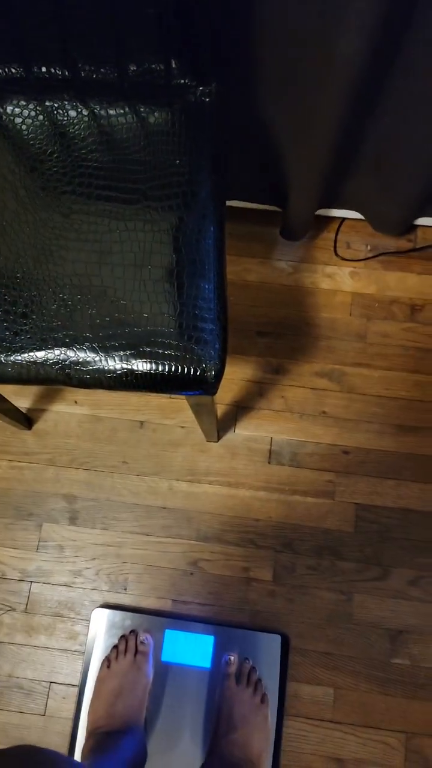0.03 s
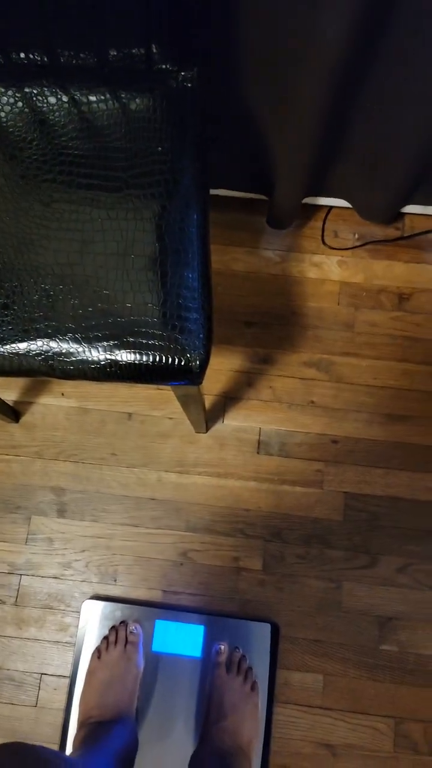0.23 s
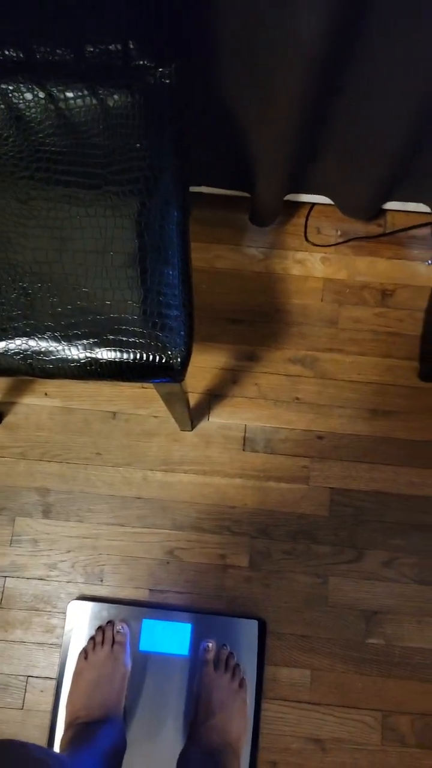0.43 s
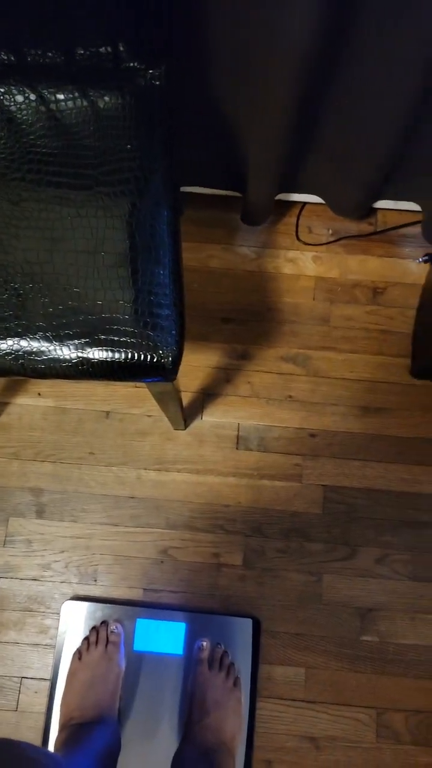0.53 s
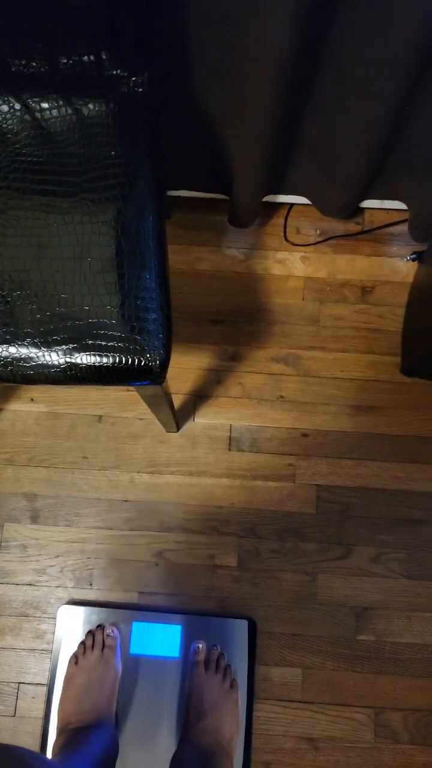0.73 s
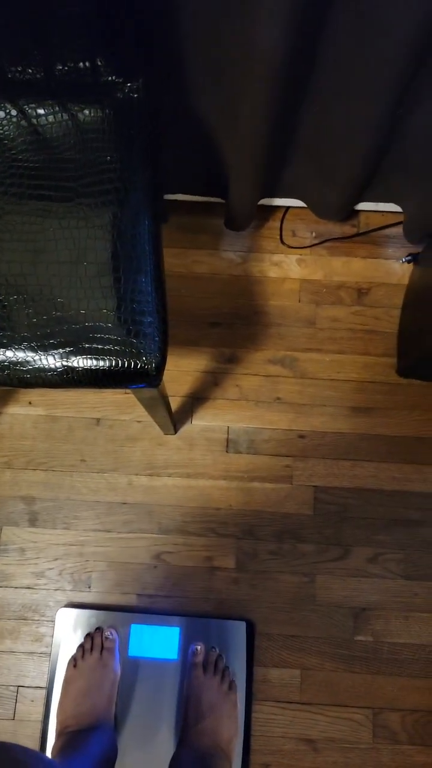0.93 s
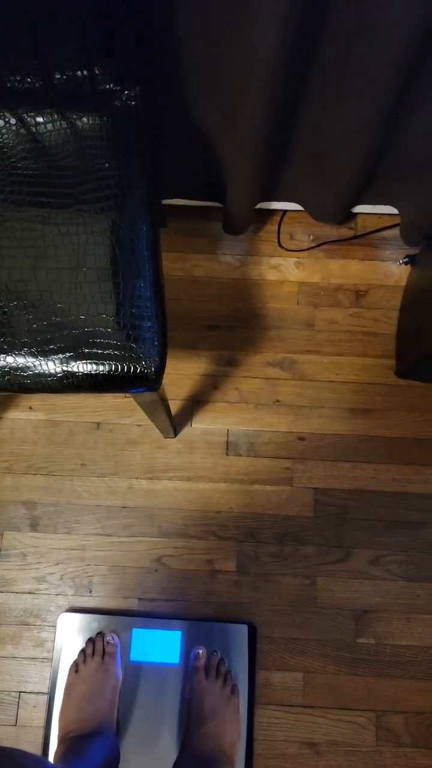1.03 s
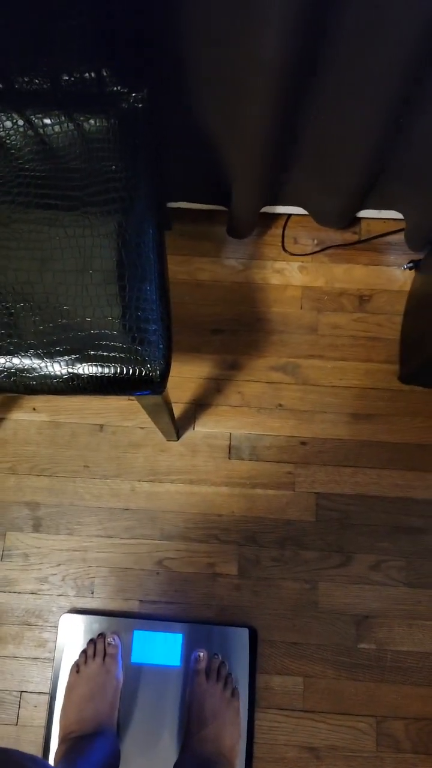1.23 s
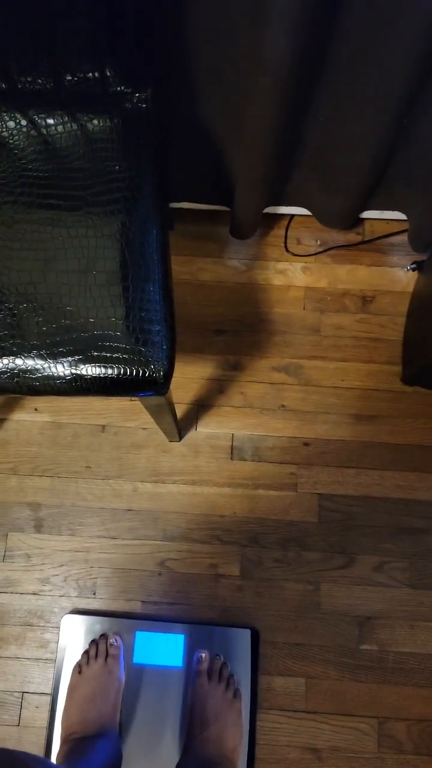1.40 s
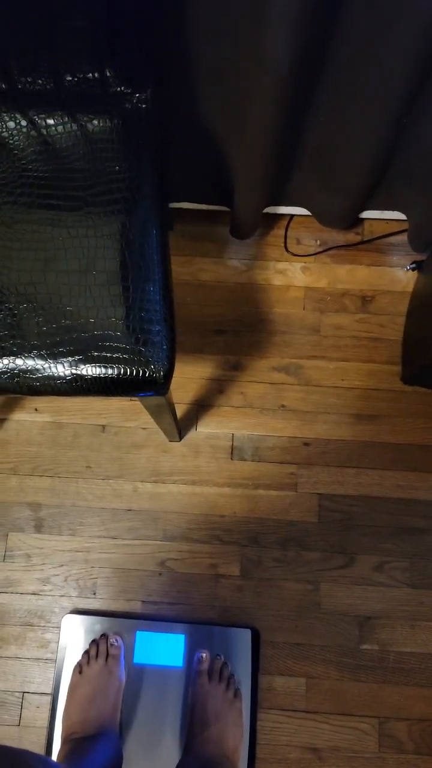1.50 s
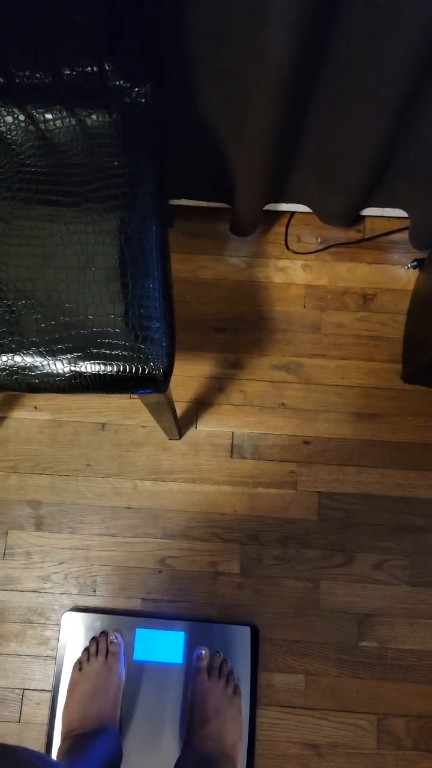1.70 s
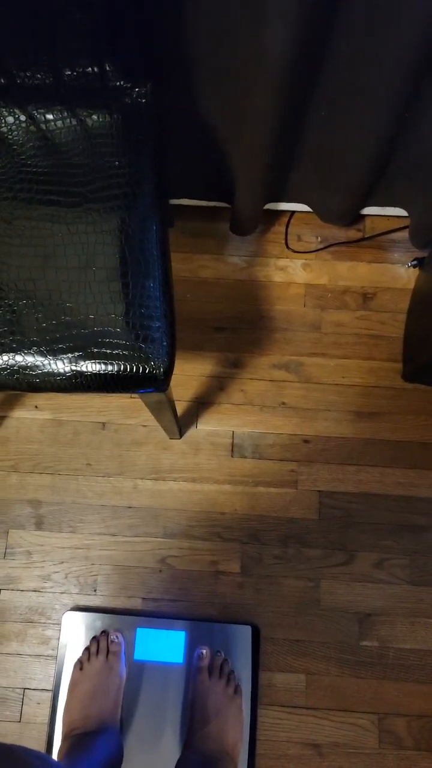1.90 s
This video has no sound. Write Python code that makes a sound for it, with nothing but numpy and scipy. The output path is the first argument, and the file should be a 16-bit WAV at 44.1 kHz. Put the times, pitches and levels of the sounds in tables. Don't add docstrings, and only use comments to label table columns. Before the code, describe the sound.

A single hard knock of a bathroom scale on a wooden floor, then faint rustling at home

```python
import sys
import numpy as np
from scipy import signal
from scipy.io import wavfile
from scipy.ndimage import uniform_filter1d

SR = 44100
rng = np.random.default_rng(int(sys.argv[2]) if len(sys.argv) > 2 else 0)


def generate_wav(sig):
    pcm = np.round(np.clip(np.atleast_2d(sig).T, -1, 1) * 32767).astype(np.int16)
    wavfile.write(sys.argv[1], SR, pcm)


def attenuation_scalar(level_db):
    decades = np.asarray(level_db, float) / 20
    return 10 ** decades


N = 85995
BANDS_HZ = 28 * 2 ** np.arange(0, 9.2, 1 / 3)
OPPOSED = np.array([[1], [-1]])


def curve(table, at, col=1, log=False):
    a = np.array(table, float)
    if log:
        return np.interp(np.log(at), np.log(a[:, 0]), a[:, col])
    return np.interp(at, a[:, 0], a[:, col])


def unit(x):
    return x / np.sqrt(np.mean(x ** 2))


def band(x, hz, width):
    ratio = np.sqrt(1 + width)
    edges_hz = [hz / ratio, min(hz * ratio, .45 * SR)]
    return signal.sosfilt(signal.butter(2, edges_hz, "band", fs=SR, output="sos"), x)


def walk(rate_hz):
    k = int(SR / rate_hz)
    return unit(uniform_filter1d(uniform_filter1d(rng.standard_normal(N), k), k))


def fall(since, rise, t60):
    return np.exp(np.where(since < 0, since / rise, -since * np.log(1000) / t60))


# [f/Hz, correlation]
LIKENESS = [(30, 1), (130, 0.58), (290, .75), (640, 0.1), (1300, -0.83), (3100, 0.14), (6800, -0.15),
            (15000, .1)]


def diffuse(hz, width):
    alike = np.clip(curve(LIKENESS, hz, log=True), -.97, .97)
    mid = unit(band(rng.standard_normal(N), hz, width))
    side = unit(band(rng.standard_normal(N), hz, width))
    return np.sqrt((1 + alike) / 2) * mid + np.sqrt((1 - alike) / 2) * side * OPPOSED


# [f/Hz, level/dB per Hz]
ROOM_BANDS = [(28, -10), (42, -23.5), (60, -10), (240, -10.5), (400, -19.5), (1300, -28), (2200, -39.5),
              (5000, -52.5)]
# [t/s, level/dB]
ROOM_FADE = [(0, 5.5), (.5, 5.5), (1., 3.5), (1.4, 2.5), (1.95, 0)]
# [f/Hz, level/dB, width/Hz]
HUM = [(58.07, -63.5, 7), (124.07, -70.5, 6.5), (187.8, -81.5, 2)]
ROOM_DB = -64.5


def room_tone(t):
    air = 0
    for hz in BANDS_HZ[:-4]:
        flicker_db = 1. * walk(2)
        level = attenuation_scalar(curve(ROOM_BANDS, hz, log=True) + flicker_db)
        air = air + level * np.sqrt(hz) * diffuse(hz, 0.28)
    air = attenuation_scalar(ROOM_DB + curve(ROOM_FADE, t)) * unit(air)
    hum = sum(attenuation_scalar(db) * diffuse(hz, width / hz) for hz, db, width in HUM)
    return air + hum


# [t/s, level/dB]
DRONE_LEVEL = [(0, -62), (.3, -62), (.35, -55), (.48, -61), (.515, -50), (.675, -51), (.73, -65),
               (.84, -52), (.93, -58), (.99, -49.5), (1.03, -58), (1.06, -52), (1.14, -61), (1.21, -55),
               (1.255, -69), (1.285, -51), (1.45, -61), (1.95, -70)]
# [t/s, f/Hz]
DRONE_PITCH = [(0, 218), (.07, 236), (.3, 247), (.5, 250), (.66, 250), (.72, 242), (.83, 246), (1.1, 244.5),
               (1.25, 251), (1.45, 243), (1.6, 240), (1.7, 256), (1.95, 262)]
DRONE_ROUGH_RAD, DRONE_WOBBLE_DB, DRONE_SIDE_DB = .25, 1., -11


def drone(t):
    phase = 2 * np.pi * np.cumsum(curve(DRONE_PITCH, t)) / SR + DRONE_ROUGH_RAD * walk(25)
    size = np.sqrt(2) * attenuation_scalar(curve(DRONE_LEVEL, t) + DRONE_WOBBLE_DB * walk(30))
    side = attenuation_scalar(DRONE_SIDE_DB) * np.cos(phase) * OPPOSED
    return size * (np.sin(phase) + side)


# [t/s, rise/s, fall t60/s,
# level/dB, centre f/Hz]
RUSTLES = [(0.215, 0.0068, 0.025, -57.5, 3000), (0.216, 0.0077, 0.028, -51, 1500),
           (0.215, 0.0074, 0.012, -65, 5500), (.527, .001, 0.033, -81.5, 13500),
           (.527, 0.0014, 0.16, -77, 4300), (0.544, 0.019, 0.21, -71.5, 3210),
           (0.556, 0.00086, 0.14, -54, 900), (0.568, 0.015, 0.075, -61, 1540),
           (0.592, 0.0019, 0.13, -59, 4440), (.590, 0.027, .17, -74, 6560),
           (0.604, 0.0011, 0.14, -52, 1070), (0.602, 0.0028, .18, -59, 1790),
           (0.602, 0.0026, 0.19, -55, 3090), (0.603, 0.0084, 0.21, -64, 5700),
           (.604, 0.0054, 0.11, -66.5, 8100), (.600, 0.0061, 0.29, -74.5, 13000),
           (0.759, .08, .6, -75, 2300), (0.749, .06, .6, -85, 8500), (1.047, .008, 0.089, -66.5, 1797),
           (1.055, 0.02, 0.14, -69.5, 2520), (1.135, 0.0025, 0.06, -71.5, 3450),
           (1.1, 0.064, 0.42, -81.5, 3500), (.575, 0.016, 0.23, -68, 2330), (0.6, 0.003, 0.073, -62.5, 526)]
RUSTLE_WIDTH, RUSTLE_GRIT_DB = .4, 1.5
SCUFF_SHAPE = 1.45


def rustles(t):
    out = 0
    for at, rise, t60, db, hz in RUSTLES:
        since = t - at
        held = t60 * (np.abs(since) / t60) ** SCUFF_SHAPE
        env = fall(np.where(since < 0, since, held), rise, t60)
        width = RUSTLE_WIDTH * np.clip(t60 / .15, .3, 4)
        out = out + attenuation_scalar(db + RUSTLE_GRIT_DB * walk(340)) * env * diffuse(hz, width)
    return out


KNOCK_AT_S = .2197
# [f/Hz, level/dB, t60/s, build-up/s]
PLATE_MODES = [(150.6, -11, 0.11, 0.014), (776, -30, .15, .004), (175, -27, .13, .015),
               (213, -32.5, 0.24, 0.0029), (355, -36, 0.15, 0.0048), (455, -51.5, .15, 0.006),
               (501, -23.5, 0.16, 0.0052), (900, -26.5, 0.11, .003), (957, -44.5, .15, 0.0077),
               (1026, -30.5, 0.18, 0.0026), (1123, -44.5, 0.14, 0.0031), (1356, -33, 0.24, 0.0048),
               (1376, -43, 0.29, .006), (2485, -46, .13, 0.0046)]


def plate(since):
    out = np.zeros((2, N))
    for hz, db, t60, grow in PLATE_MODES:
        alike = np.clip(curve(LIKENESS, hz, log=True), -1, 1)
        lag = np.arccos(alike) * .35 * OPPOSED
        env = (1 - np.exp(-since / grow)) ** 2 * fall(since, 1, t60)
        out += attenuation_scalar(db) * env * np.sin(2 * np.pi * hz * since + lag)
    return out


# [t/s, level/dB, f/Hz]
CONTACTS = [(.2199, -14, 1560), (.2212, -23, 1330), (.2228, -7, 1134), (.2320, -21.5, 1193),
            (0.24, -18.5, 2390), (0.2498, -18, 1200), (0.256, -19, 1300), (0.275, -20.5, 1200),
            (.5585, -47.5, 700), (.6015, -63, 1170), (0.61, -43, 3040)]


def contacts(t):
    out = np.zeros((2, N))
    port_delay_s = np.array([[0], [.0003]])
    for at, db, hz in CONTACTS:
        since = np.maximum(t - at - port_delay_s, 0)
        out += attenuation_scalar(db) * (since / .0007) * np.exp(-since / 0.00092) * np.sin(2 * np.pi * hz * since)
    return out


# [f/Hz, level/dB]
KNOCK_BANDS = [(80, -16.5), (250, -14.5), (600, -12.5), (1100, -6), (2600, -16.5), (4500, -23), (9500, -43),
               (15500, -46)]
# [f/Hz, t60/s]
RING = [(100, 0.39), (500, 0.19), (1500, .26), (4000, 0.2), (9000, 0.12), (15000, 0.1198)]
KNOCK_DB, RATTLE_HOLD_S, CLUMP_DB = -25, 0.016, 2.5
TAIL_DB, TAIL_T60_S = -49.5, 0.97


def rattle_and_room(since):
    wash = 0
    tail = attenuation_scalar(TAIL_DB) * fall(since, 1, TAIL_T60_S)
    for hz in BANDS_HZ[8:].tolist() + [75., 95.]:
        hold_s = RATTLE_HOLD_S * min(1, 3000 / hz)
        early = fall(np.maximum(since - hold_s, 0), 1, curve(RING, hz, log=True))
        level = attenuation_scalar(curve(KNOCK_BANDS, hz, log=True) + CLUMP_DB * walk(120)) * np.sqrt(hz / 1000)
        wash = wash + level * (early + tail) * diffuse(hz, 0.28)
    onset = 1 - np.exp(-since / 0.00013)
    return attenuation_scalar(KNOCK_DB) * wash * onset


def knock(t):
    since = np.maximum(t - KNOCK_AT_S, 0)
    return plate(since) + contacts(t) + rattle_and_room(since)


def scene():
    t = np.arange(N) / SR
    right_db = 3.2
    mix = room_tone(t) + drone(t) + rustles(t) + knock(t)
    return mix * attenuation_scalar(-right_db / 2 * OPPOSED)


# [f/Hz, band level/dB]
HISS_BANDS = [(5000, -106), (8000, -105), (10500, -105), (13000, -99), (15500, -100)]
# [t/s, level/dB]
HISS_SWELL = [(0, 6.5), (.45, 6.5), (.7, 6), (1.2, 10), (1.35, 0), (1.5, 8.5), (1.7, 0.5), (1.95, 3)]


def phone(dry):
    t = np.arange(N) / SR
    limit, top_hz = .3, 15720
    hiss = sum(attenuation_scalar(curve(HISS_BANDS, hz, log=True)) * diffuse(hz, .3) for hz in BANDS_HZ[-6:])
    hiss = hiss * attenuation_scalar(curve(HISS_SWELL, t))
    rounded = limit * np.tanh(dry / limit)
    top_cut = signal.ellip(10, .2, 80, top_hz, fs=SR, output="sos")
    return signal.sosfilt(top_cut, rounded + hiss)


def band_limit(x):
    return signal.sosfilt(signal.butter(12, 16390, fs=SR, output="sos"), x)


def record(dry):
    mix = phone(dry)
    return band_limit(mix)


dry = scene()
out = record(dry)
generate_wav(out)
```